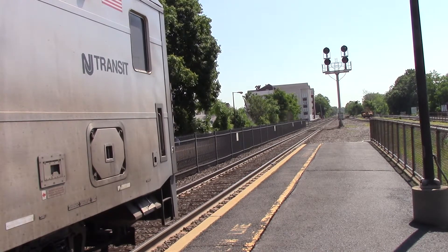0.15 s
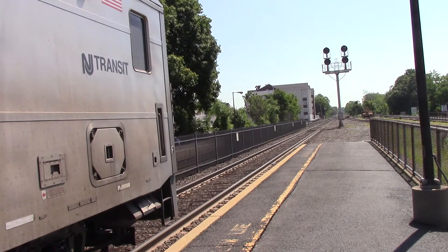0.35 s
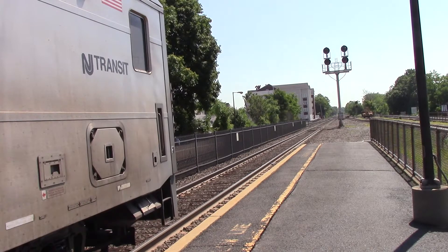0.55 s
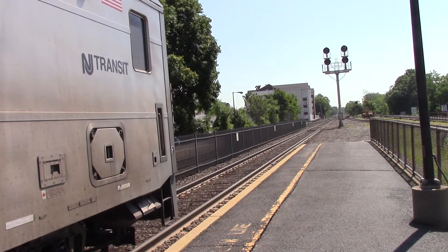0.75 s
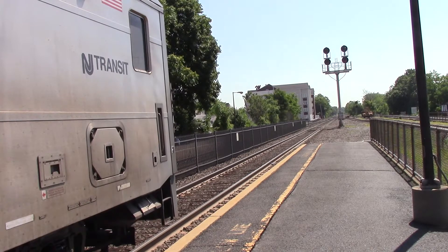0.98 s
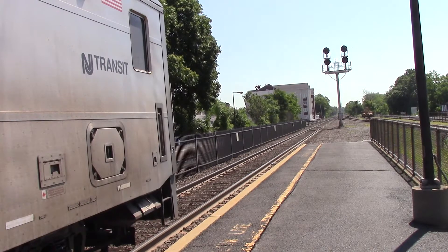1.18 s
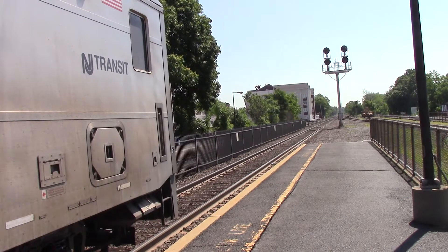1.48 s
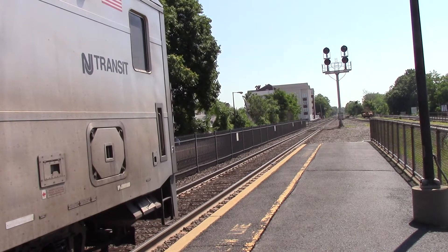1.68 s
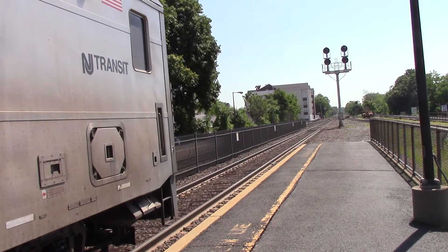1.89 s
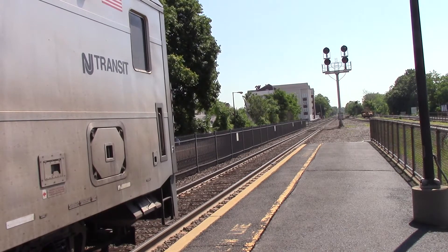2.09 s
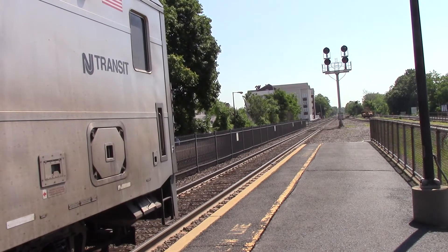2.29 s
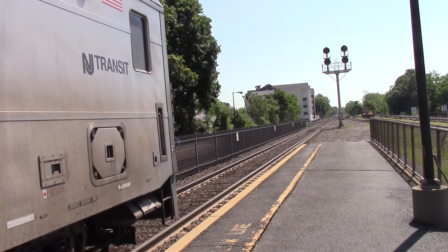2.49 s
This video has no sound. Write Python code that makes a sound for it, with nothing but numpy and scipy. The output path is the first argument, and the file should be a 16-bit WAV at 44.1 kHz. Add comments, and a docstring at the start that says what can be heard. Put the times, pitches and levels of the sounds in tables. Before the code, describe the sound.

A loud burst of compressed air hisses from a standing train and fades over low machinery hum

```python
"""Beside a station platform, a standing passenger train vents compressed air over steady rumble and hum.
The jet is filtered noise fading from bright to dull, with valve resonances that follow its level.
Noise through narrow resonances makes the exhaust pipe ring, strongest near 2.5-3 kHz, and the thin closing leak.
Two soft clanks from under the car are short bursts of coloured noise; the machinery is low
coloured noise plus a wavering sine hum."""
import sys
import numpy as np
from scipy import signal
from scipy.fft import rfft, irfft
from scipy.io import wavfile

SR = 44100
rng = np.random.default_rng(int(sys.argv[2]) if len(sys.argv) > 2 else 0)


def materialize(psi):
    """Save the field psi as 16-bit PCM at rate SR to the path in sys.argv[1].

    A 1-D psi becomes a single channel; in a 2-D psi each row is a channel.
    """
    bounded = np.clip(np.atleast_2d(psi).T, -1, 1)
    quanta = np.round(bounded * 32767).astype(np.int16)
    wavfile.write(sys.argv[1], SR, quanta)


N = 116865  # length [samples]

# Levels and colours are relative: the trims below, the echo and the filters also shape the result.
# Broad machinery rumble, colour: (frequency [Hz], density [dB per Hz])
RUMBLE_COLOUR = [(20, -40), (40, -35), (60, -4), (80, -19), (100, -10), (170, -3), (245, -1.5), (310, 2.5),
                 (400, -0.5), (530, -1), (600, -7), (850, -6), (1000, -14), (1800, -13), (2800, -20.5),
                 (3500, -29), (8000, -34), (15000, -55)]
# Rumble loudness: (time [s], level [dB])
RUMBLE_LEVEL = [(0, -29.5), (.5, -33), (.95, -31.5), (1.3, -27), (1.9, -28), (2.3, -28), (2.65, -27.5)]
# Low machinery drone, resonances: (frequency [Hz], width [Hz], level [dB])
DRONE_MODES = [(117.4, 22.7, -1.5), (153, 16, -3.5), (176.3, 21.4, 1.5), (206.2, 38, -3.5)]
# Drone loudness: (time [s], level [dB])
DRONE_LEVEL = [(0, -30.5), (.4, -32), (.8, -30), (1.13, -30.5), (1.24, -24.5), (1.38, -26.5), (1.72, -26),
               (1.87, -23), (2.12, -25.5), (2.65, -26.5)]
HUM_HZ, HUM_WAVER_HZ, HUM_DB = 177.6, 1.3, -15  # hum level is relative to the drone noise

# Clanks under the car: (start time [s], level [dB])
CLANKS = [(2.138, -27), (2.227, -24)]
# Clank colour: (frequency [Hz], density [dB per Hz])
CLANK_COLOUR = [(150, -11), (700, 6), (1300, 4), (1800, 6), (2700, 6), (3600, -7), (5000, -16),
                (10000, -32)]
CLANK_RISE_S, CLANK_T60_S = 0.003, 0.19

# Lingering leak, resonances: (frequency [Hz], width [Hz], level [dB])
LEAK_MODES = [(5020, 250, -9), (5620, 60, -7), (6053, 55, -1), (6272, 90, -4), (6525, 55, -3),
              (6611, 50, -3), (6795, 70, 2), (6910, 90, -2), (9130, 350, -10), (10680, 120, -11),
              (11075, 180, -6), (11430, 110, -9), (11628, 60, -4)]
LEAK_DB, LEAK_PEAK_S, LEAK_RISE_DB_PER_S, LEAK_FALL_DB_PER_S = -31.5, 1.636, 14, 13

# Exhaust pipe resonances: (frequency [Hz], width [Hz], level [dB])
PIPE_MODES = [(1496, 26, -12.5), (1597, 30, -14.5), (1696, 36, -7), (1842, 60, -11.5), (1945, 35, -13.5),
              (2033, 36, -11.5), (2266, 50, -17), (2437, 32, 1.5), (2500, 90, -8), (2650, 42, -4.5),
              (2742, 33, -1.5), (2837, 55, -7), (2956, 44, -1.5), (3050, 35, -11), (3108, 45, -11)]
# Pipe ring loudness: (time [s], level [dB])
PIPE_LEVEL = [(0, -22), (.4, -22.5), (.75, -21.5), (.93, -21), (1.12, -20), (1.22, -19), (1.35, -19.5),
              (1.56, -21), (1.68, -23), (1.8, -24.5), (1.88, -27.5), (2.01, -38), (2.3, -38), (2.65, -41.5)]
PIPE_TRIM_DB = 1.5

# Air jet loudness: (time [s], level [dB])
JET_LEVEL = [(0.0, -12.5), (0.22, -13), (0.92, -20), (1.25, -21), (1.78, -28), (2.09, -40.5), (2.65, -43)]
# Jet colour at full pressure: (frequency [Hz], density [dB per Hz])
JET_FULL_COLOUR = [(100, -41), (300, -9), (520, -2.5), (620, -11), (1100, -4), (1400, -9), (1800, 0),
                   (2200, -6), (2900, 4), (3300, 2.5), (3700, -6), (4300, -5), (5000, 1.5), (5600, -2.5),
                   (7300, -0.5), (8800, 0), (9700, -4), (11500, -1), (12200, -7), (13300, -9.5),
                   (14000, -13.5), (15800, -17)]
# Jet colour when nearly spent: (frequency [Hz], density [dB per Hz])
JET_SPENT_COLOUR = [(100, -34), (300, -20), (620, -1), (1100, 3), (1400, 1.5), (1800, 0.5), (2200, 7),
                    (2900, 1.5), (3250, 1), (3700, -0.5), (4400, -4.5), (5100, -2.5), (5500, 2),
                    (6200, 3.5), (6900, 2), (7500, -6), (9100, 2.5), (9700, -7), (11400, 0.5),
                    (12200, -17.5), (13300, -1), (13900, -26), (15800, -7)]
# Narrow valve resonances blown by the jet: (frequency [Hz], width [Hz], level [dB])
VALVE_MODES = [(3630, 50, -2), (3735, 40, -4), (3822, 30, -2), (3910, 60, -4), (4128, 40, -2),
               (4280, 50, -4), (4425, 50, -4), (4803, 40, -3), (5010, 90, -4), (5240, 80, -3),
               (5857, 35, -2), (6050, 55, -.5), (6180, 60, -2), (6420, 55, -3.5), (6803, 45, 0),
               (6895, 55, 3), (7172, 60, 2), (7370, 70, -2), (7775, 60, 0), (8139, 45, -1), (8320, 45, -1),
               (8540, 90, -2), (9033, 80, -1), (9870, 140, -7), (13235, 90, -10)]
DULL_FROM_S, DULL_TO_S = 0.18, 1.7
SHUT_FROM_S, SHUT_DB_PER_S = 1.44, 1.5  # the valve seats: the jet gives way to the leak
HISS_TRIM_DB, VALVE_TRIM_DB = -1.16, -5

ECHO_DB, SCATTER_T60_S = -13, 0.087
# Coherent stereo difference: (frequency [Hz], side relative to mid [dB])
SIDE_GAIN = [(100, -78), (7800, -57), (8500, -23), (9400, -22), (11500, -17), (12200, -25), (13000, -45),
             (16000, -50)]
# Phase of that difference: (frequency [Hz], phase [radians])
SIDE_PHASE = [(8300, 0.3), (9200, 0.97), (10200, .1), (11400, -.4)]
# Sound reaching the two microphones by different paths: (frequency [Hz], level relative to mid [dB])
DIFFUSE_GAIN = [(100, -60), (3000, -79), (5000, -43), (7500, -31), (9500, -14), (11800, -18), (13000, -36),
                (16000, -30)]
# Outdoor rumble that differs between microphones: (frequency [Hz], level relative to rumble [dB])
RUMBLE_SIDE_GAIN = [(30, -22), (80, -36), (170, -49), (350, -37.5), (650, -29), (1500, -35.5), (4000, -24),
                    (7000, -21), (12000, -25)]
MIC_LOW_CUT_HZ, RECORDER_EDGE_HZ = 67, 15800


def amp(db):
    """Decibels to gain."""
    return 10 ** (np.asarray(db) / 20)


def unit(x):
    """Scales to rms 1."""
    return x / np.sqrt(np.mean(x ** 2) + 1e-20)


def clock():
    """Time of each sample [s]."""
    return np.arange(N) / SR


def curve(points):
    """Joins (time, value) points by straight lines."""
    return np.interp(clock(), *np.transpose(points))


def bins():
    """Frequencies of the full-length spectrum [Hz]."""
    return np.fft.rfftfreq(N, 1 / SR)


def colour(points):
    """Gain per frequency: (frequency, dB) points joined along a log-frequency axis."""
    hz, db = np.transpose(points)
    return amp(np.interp(np.log(bins() + 1), np.log(hz + 1), db))


def resonances(modes):
    """Gain per frequency of steep-sided resonances, summed in power."""
    power = 0
    for hz, width, db in modes:
        offset = (bins() - hz) / width
        power = power + (amp(db) / (1 + 2 * offset ** 2)) ** 2
    return np.sqrt(power)


def noise(gain):
    """Gaussian noise shaped by a gain per frequency, at rms 1."""
    return unit(irfft(rfft(rng.standard_normal(N)) * gain, N))


def flutter(rate_hz):
    """Slow random motion of rms 1, concentrated around a rate."""
    ratio = bins() / rate_hz
    return noise(ratio / (1 + ratio ** 3))


def machinery():
    """Broad rumble of the idling train: coloured noise on a slow level curve."""
    return amp(curve(RUMBLE_LEVEL)) * noise(colour(RUMBLE_COLOUR))


def drone():
    """Lumpy low drone of the machinery: resonant noise with one hum of wavering pitch in it."""
    pitch = HUM_HZ + HUM_WAVER_HZ * flutter(rate_hz=5.8)
    hum = np.sin(2 * np.pi * np.cumsum(pitch) / SR)
    body = noise(resonances(DRONE_MODES))
    return amp(curve(DRONE_LEVEL)) * (body + amp(HUM_DB) * unit(hum))


def clanks():
    """Dull, quickly damped knocks, probably the brake rigging settling: noise bursts with fast decay."""
    out = np.zeros(N)
    for start, db in CLANKS:
        t = np.maximum(clock() - start, 0)
        attack = np.minimum(t / CLANK_RISE_S, 1)
        decay = amp(db - 60 * t / CLANK_T60_S)
        out += attack * decay * noise(colour(CLANK_COLOUR))
    return out


def leak():
    """A thin whistling hiss of resonant noise that comes out as the jet dies, then fades."""
    t = clock() - LEAK_PEAK_S
    swell = np.minimum(LEAK_RISE_DB_PER_S * t, -LEAK_FALL_DB_PER_S * t)
    return amp(LEAK_DB + swell) * noise(resonances(LEAK_MODES))


def pipe():
    """The air stream keeps the exhaust pipe ringing: noise through the pipe's resonances."""
    return amp(PIPE_TRIM_DB + curve(PIPE_LEVEL)) * noise(resonances(PIPE_MODES))


def jet():
    """Escaping air: a broad hiss that dulls as pressure falls and blows the valve's resonances."""
    spent = np.clip((clock() - DULL_FROM_S) / (DULL_TO_S - DULL_FROM_S), 0, 1)
    # equal-power crossfade from bright to dull
    bright = np.sqrt(1 - spent) * noise(colour(JET_FULL_COLOUR))
    dull = np.sqrt(spent) * noise(colour(JET_SPENT_COLOUR))
    hiss = bright + dull
    valve = noise(resonances(VALVE_MODES))
    shutting = SHUT_DB_PER_S * np.maximum(clock() - SHUT_FROM_S, 0)
    level = curve(JET_LEVEL) - shutting + 0.15 * flutter(rate_hz=16)  # flutter in dB
    return amp(level) * (amp(HISS_TRIM_DB) * hiss + amp(VALVE_TRIM_DB) * valve)


def scatter(x):
    """Dense short reflections of random sign, at about the energy of the direct sound."""
    t = np.arange(SR // 5) / SR
    taps = rng.standard_normal(len(t)) * amp(-60 * t / SCATTER_T60_S)
    return signal.fftconvolve(x, taps / np.linalg.norm(taps))[:N]


def scene():
    """All sources reach a nearly mono microphone pair that opens a little in the treble."""
    rumble = machinery()
    under_car = jet() + clanks()
    echo = amp(ECHO_DB) * scatter(under_car)
    mid = rumble + drone() + leak() + pipe() + under_car + echo
    phase = np.interp(bins(), *np.transpose(SIDE_PHASE))
    direct = rfft(mid) * colour(SIDE_GAIN) * np.exp(1j * phase)
    diffuse = rfft(scatter(mid)) * colour(DIFFUSE_GAIN)
    wide_rumble = rfft(scatter(rumble)) * colour(RUMBLE_SIDE_GAIN)
    side = irfft(direct + diffuse + wide_rumble, N)
    return np.array([mid + side, mid - side])


def record(dry):
    """The microphone's bass roll-off, then the recorder's steep treble limit."""
    low_cut = 1 / np.sqrt(1 + (MIC_LOW_CUT_HZ / (bins() + 1)) ** 4)
    thin = irfft(rfft(dry) * low_cut, N)
    band_limit = signal.firwin(1023, RECORDER_EDGE_HZ, window=("kaiser", 9), fs=SR)
    return signal.oaconvolve(thin, band_limit[None], "same")


dry = scene()
out = record(dry)
materialize(out)
```